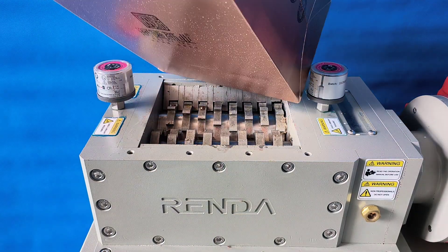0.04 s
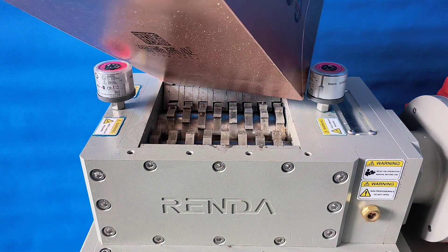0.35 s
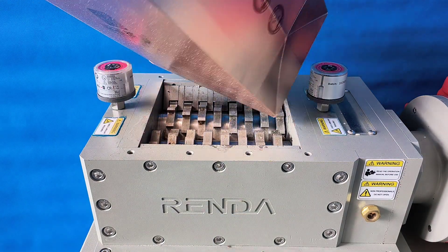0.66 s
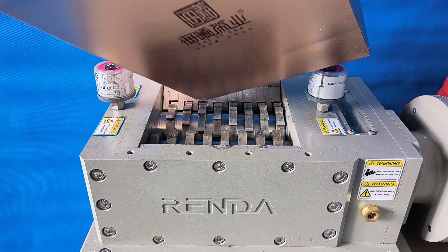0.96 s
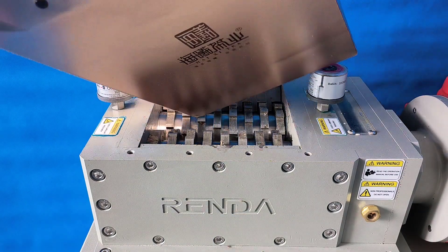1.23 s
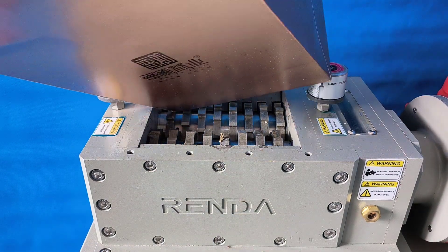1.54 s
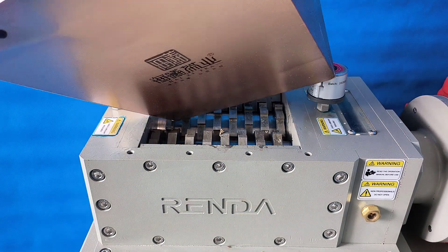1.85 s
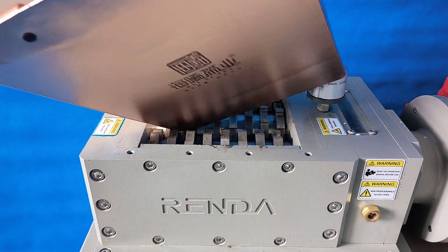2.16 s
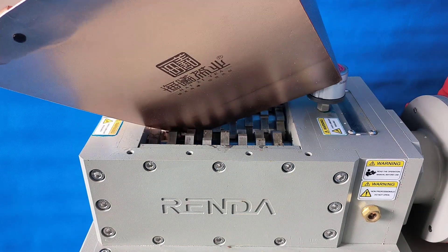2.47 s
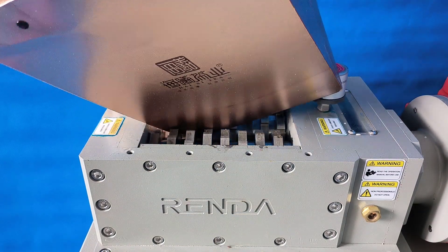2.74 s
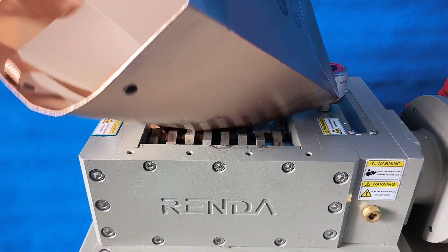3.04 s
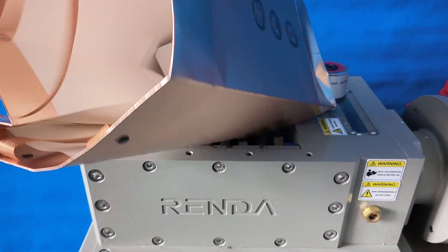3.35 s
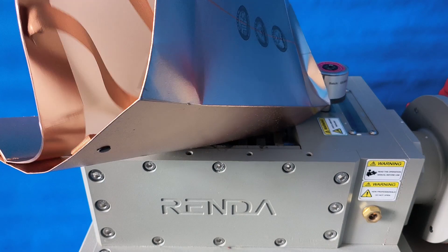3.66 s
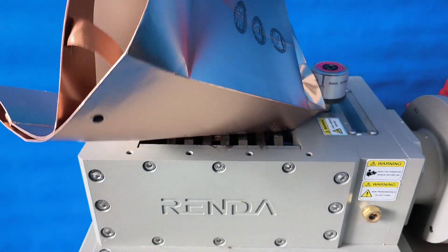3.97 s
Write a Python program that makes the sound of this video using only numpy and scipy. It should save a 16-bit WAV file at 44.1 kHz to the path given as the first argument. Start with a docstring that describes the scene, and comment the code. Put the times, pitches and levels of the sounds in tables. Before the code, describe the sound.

A shredder crushes a stiff cardboard box, crunching and cracking over its humming, whining motor.

```python
"""A small workshop, the microphone close to a running twin-shaft shredder: mains hum, growling and
whining gears, a thin inverter whistle. The toothed rollers rub for a moment. A stiff cardboard box
brushes them, then is gripped and shoved: its fibres crunch, its walls crack, its folds creak and its
hollow panels buckle with dull pops. The room answers the cracks, creaks and pops with a short tail."""
import sys
import numpy as np
from scipy import signal
from scipy.fft import rfft, irfft
from scipy.io import wavfile
from scipy.ndimage import uniform_filter1d

SR = 44100
rng = np.random.default_rng(int(sys.argv[2]) if len(sys.argv) > 2 else 0)


def file_out(sig):
    """Save sig as 16-bit WAV at sys.argv[1]."""
    # one column per channel
    cols = np.atleast_2d(sig).T
    # limit, then scale
    lim = np.clip(cols, -1, 1)
    pcm = np.round(lim * 32767).astype(np.int16)
    wavfile.write(sys.argv[1], SR, pcm)


N = 176400
T = np.arange(N) / SR

# the one rub of the rollers: peak_s, width_s, level_db
ROLLER_RUB = (0.46, 0.1, -52)
# spectrum of crunching board and scraping steel: frequency_hz, gain_db
CRUNCH_COLOUR = [(300, -43), (900, 9), (1700, 5.5), (2300, 4), (3300, 7), (5000, -1), (7000, -7.5),
                 (10000, -27), (16000, -27)]
# the course of the crushing: time_s, crumple_db, crunch_db, hiss_db
CRUSH_LEVELS = [(0, -85, -70, -91), (1.17, -54, -55.5, -79), (1.26, -34, -51, -70), (1.4, -47, -53.5, -82),
                (1.65, -42.5, -55, -82), (1.8, -79, -92, -100), (2.15, -48, -58, -97),
                (2.42, -40.5, -52, -66), (2.53, -44, -46.5, -54), (2.68, -36.5, -43.5, -61),
                (2.78, -52, -47, -55), (2.85, -37, -47, -57), (2.94, -46, -40, -57),
                (3.061, -40, -40.5, -51), (3.22, -31.5, -39, -48), (3.3, -40.5, -48, -51),
                (3.39, -41, -49, -71), (3.47, -42.5, -43, -55), (3.54, -39, -37, -47.5),
                (3.63, -35.5, -42, -53), (3.69, -35.5, -40, -50), (3.76, -46, -40, -49.5),
                (3.91, -34, -40, -50), (4, -38, -39, -46)]


def undb(db):
    """Decibels to gain."""
    return 10 ** (np.asarray(db) / 20)


def unit(x):
    """Scale to rms 1."""
    return x / np.sqrt(np.mean(x ** 2))


def curve(points):
    """Join (time_s, value) points with straight lines."""
    return np.interp(T, *np.array(points).T)


def fade(t, t60_s):
    """Decay that falls 60 dB in t60_s."""
    return np.exp(-np.log(1000) * t / t60_s)


def gains(points, size):
    """Gain per frequency bin from (frequency_hz, gain_db) points."""
    hz, db = np.array(points, float).T
    return undb(np.interp(np.log(np.fft.rfftfreq(size, 1 / SR) + 1), np.log(hz), db))


def colour(x, points):
    """Causal filter with the given spectral shape; white noise keeps its power."""
    size = x.shape[-1]
    cepstrum = irfft(np.log(unit(gains(points, size))), size)
    cepstrum[1:size // 2] *= 2
    cepstrum[size // 2 + 1:] = 0
    return irfft(rfft(x) * np.exp(rfft(cepstrum)), size)


def sides(pan_db):
    """Channel gains for a pan, given as left minus right."""
    pair = undb(np.array([pan_db, -pan_db]) / 2).reshape(2, -1)
    return pair / np.sqrt(np.mean(pair ** 2, axis=0))


def noise(size):
    """White noise at the stereo microphone: alike in the bass, apart in the treble."""
    # side against mid: frequency_hz, gain_db
    stereo_width = [(25, -5), (60, -36), (160, -4.5), (280, -8.5), (500, -10.5), (1000, 3), (2000, 2),
                    (16000, 0)]
    # left against right: frequency_hz, pan_db
    balance = [(100, 1.5), (1200, -1.5), (2000, 1), (2800, 9.5), (4500, 3.5), (8000, 0.5), (15000, 2.5)]
    mid, side = rfft(rng.standard_normal((2, size)))
    width = gains(stereo_width, size)
    pair = np.array([mid + width * side, mid - width * side]) / np.sqrt(1 + width ** 2)
    return irfft(pair * sides(20 * np.log10(gains(balance, size))), size)


def walk(per_s):
    """Smooth random wander with a spread near 1."""
    hold = max(int(SR / per_s), 2)
    steps = np.repeat(rng.standard_normal(N // hold + 2), hold)
    return 1.3 * uniform_filter1d(uniform_filter1d(steps, hold), hold)[:N]


def add(out, start_s, x):
    """Mix a sound in at a time."""
    i = max(int(start_s * SR), 0)
    out[:, i:i + x.shape[-1]] += x[:, :max(N - i, 0)]


def tone(hz, wander_hz, flutter_db, per_s, speed=1):
    """A wavering partial; high ones reach the two channels out of step."""
    phase = 2 * np.pi * (np.cumsum(hz * speed + wander_hz * walk(per_s)) / SR + rng.random())
    lag = np.pi / 2 * min(hz / 1200, 1) ** 2
    return unit(np.sin([phase, phase + lag]) * undb(flutter_db * walk(per_s)))


def motor():
    """Mains hum and the inverter's thin whistle with its sidebands."""
    # mains hum: pitch_hz, level_db
    hum_partials = [(99.7, -34.5), (199.4, -43.5)]
    # the whistle as the box moves over the machine: time_s, level_db
    whistle_levels = [(0, -57), (.3, -55), (.65, -55.5), (1, -50), (1.45, -52.5), (2.1, -51), (2.7, -54),
                      (4, -55.5)]
    # sidebands of the whistle and one faint, very high inverter line: pitch_hz, level_db, pan_db
    inverter_partials = [(7305, -72, 0), (7504, -72, 0), (7751, -61, 1), (7950, -66, 0), (8249, -58.5, 0),
                         (8349, -74, 0), (15800, -80, 0)]
    whistle_hz, whistle_pan_db = 8049.8, -2
    hum = sum(undb(db) * tone(hz, wander_hz=0.34, flutter_db=0.65, per_s=8) for hz, db in hum_partials)
    partials = [(whistle_hz, curve(whistle_levels), whistle_pan_db)] + inverter_partials
    return hum + sum(undb(db) * sides(pan_db) * tone(hz, wander_hz=0.67, flutter_db=-2.7, per_s=5.12)
                     for hz, db, pan_db in partials)


def gear_growl():
    """The low partials of the gearbox throb together."""
    # gearbox growl: pitch_hz, level_db
    partials = [(116, -49.5), (154, -48.5), (166, -43), (186, -41.5), (205, -45)]
    growl = sum(undb(db) * tone(hz, wander_hz=5.113, flutter_db=2, per_s=25) for hz, db in partials)
    throb_db = 2.2 * walk(per_s=28)
    return growl * unit(undb(throb_db))


def gear_whine():
    """The gears whine on one shaft speed; strain and rubbing lift the upper partials."""
    # the whine, one entry a partial: pitch_hz, level_db, pan_db, rub_lift_db
    pitch_hz = [414.5, 479, 499, 646, 696, 843, 926, 1028, 1217, 1335, 1348, 1733, 1771, 1956, 2168, 2190,
                2377, 2797, 3219, 3545, 3639, 4146, 4566]
    level_db = [-59.5, -56.5, -55.5, -53, -61, -54.5, -61, -62, -64, -58, -58.5, -64, -68, -67, -64, -56.5,
                -70, -64.5, -62, -64, -72, -61, -64]
    pan_db = [-27, -14, 0, 29, 0, 11, 4, -1, 4, 3, -6, 2, -12, -1, 1, -1, -8, 10, 1, 8, 7, 2, -2]
    rub_lift_db = [0, 0, 0, 1, 0, 0, 0, 0, 0, 2, 0, 9, 7, 3, 5, 7.5, 9, 13, 4, 1, 7, 5, 0]
    # the shaft slows a little under load: time_s, share_of_idle_speed
    shaft_speed = [(0, 1), (.3, 1), (.45, .9965), (.62, 1), (2.4, 1), (2.8, .998), (3.2, .998), (3.5, .995),
                   (4, .994)]
    # swell as the teeth rub or bite: time_s, gain_db
    strain = [(0, 0.5), (.28, 0.5), (.46, 2), (.62, 1.5), (1, 3), (1.3, 2.5), (2, 0), (2.4, -1), (2.6, 2.5),
              (3, 4.5), (3.5, 7), (4, 4)]
    speed = curve(shaft_speed) + 0.0005 * walk(per_s=3.01)
    strain_db, rub = curve(strain), rub_strength()
    out = np.zeros((2, N))
    for hz, db, pan, lift_db in zip(pitch_hz, level_db, pan_db, rub_lift_db):
        gain = undb(db + strain_db * (hz > 1200) + lift_db * rub)
        out += gain * sides(pan) * tone(hz, wander_hz=3, flutter_db=1.7, per_s=70, speed=speed)
    return out


def rollers_and_fan():
    """The rollers rattle and the fan rushes: a bed of slightly flickering noise."""
    # spectrum of the running machine: frequency_hz, gain_db
    running_colour = [(20, -43), (37, -5.5), (70, 1.5), (170, -2), (250, -0.5), (350, -10), (500, -6.5),
                      (750, -7), (1050, -11), (1300, -8), (1500, -16.5), (2200, -18.5), (3300, -20),
                      (4500, -24), (6500, -34.5), (8000, -22), (9300, -47.5), (15500, -46.5)]
    level_db, flicker_db = -40, 0.87
    rush = noise(N) * undb(flicker_db * walk(per_s=120))
    return unit(colour(rush, running_colour)) * undb(level_db)


def rub_strength():
    """How hard the idle rollers rub, 0 to 1."""
    peak_s, width_s, _ = ROLLER_RUB
    return np.exp(-((T - peak_s) / width_s) ** 2)


def rubbing():
    """Steel scrapes on steel for a moment."""
    _, _, level_db = ROLLER_RUB
    return colour(noise(N), CRUNCH_COLOUR) * undb(level_db) * rub_strength()


def cracks():
    """Each crack is a burst of breaking fibres that dies within milliseconds."""
    # cracks of the walls: start_s, level_db, body_db, treble_db, decay_s
    breaks = [(0.584, -37.5, -3, -16, 0.0025), (1.21, -35, 11, -4, 0.0083), (1.236, -37, 5, -14, .005),
              (1.249, -31.5, 2, -32, 0.009), (1.345, -35, 9, -23, 0.0039), (1.437, -44, 5, -3, .008),
              (1.62, -39, -7, -13, 0.0052), (2.192, -37, 1, -9, .003), (2.292, -32.5, 7, 2, 0.0059),
              (2.428, -35, 9, -37, 0.0048), (2.468, -41, -8, 15, .002), (2.488, -38, -4, 8, .002),
              (2.596, -31, -12, -2, 0.0023), (2.8013, -14, -11, -19, 0.0039), (2.9644, -23, 1, 1.5, 0.0048),
              (2.986, -21.5, 23, 1, 0.0038), (3.044, -26, 14, -14, 0.013), (3.064, -19.5, 21, -16, 0.0034),
              (3.0814, -27.5, -9, 13, 0.0026), (3.092, -26, 1, -14, .002), (3.131, -30.5, -9, -1, 0.0054),
              (3.148, -39, -3, -3, .003), (3.263, -37.5, -13, 20, .003), (3.327, -27, 7, -3, 0.0071),
              (3.3355, -19.5, 10, -7, 0.0054), (3.3438, -14.5, 8.5, -1, 0.004), (3.3496, -20, 7, 1, 0.0038),
              (3.356, -29, -2, 15, 0.0034), (3.3645, -14.5, -8, 11.5, 0.0032), (3.412, -29, -1, -18, .003),
              (3.467, -32, -4, 13, 0.0018), (3.5007, -19.5, -1.5, -23, 0.01),
              (3.5065, -19.5, 15, -6, 0.0066), (3.557, -33, 0, 10, 0.0018), (3.595, -29, 3, -30, 0.011),
              (3.612, -21.5, 1, -15, 0.0041), (3.621, -26, 5, -8, 0.0082), (3.633, -22.5, 3.5, 6, 0.0082),
              (3.654, -31, 2, -13, 0.0024), (3.662, -24, -14, 18, 0.00085), (3.722, -29.5, 8, -8, 0.018),
              (3.756, -27.5, -6, -8, 0.0047), (3.8222, -17, 21, -22, 0.0014), (3.896, -36, 8, -13, 0.0032),
              (3.9319, -17.5, 11.5, 6.5, 0.0032), (3.9526, -22.5, 10.5, 6, 0.0065)]
    # spectrum that body and treble reshape for each crack: frequency_hz, gain_db
    crack_colour = [(80, -20), (400, -5), (1100, -1.5), (2000, -0.5), (3300, 5.5), (5200, 1), (7000, -5),
                    (10000, -10), (16000, -20.5)]
    out, t = np.zeros((2, N)), T[:4096]
    hz, base_db = np.array(crack_colour).T
    body, treble = 1 / (1 + (hz / 2400) ** 6), 1 / (1 + (7000 / hz) ** 4)
    for start_s, level_db, body_db, treble_db, decay_s in breaks:
        shape_db = base_db + body_db * body + treble_db * treble
        burst = noise(len(t)) * np.exp(-t / decay_s)
        add(out, start_s, undb(level_db) * colour(burst, np.column_stack([hz, shape_db])))
    return out


def fibres(snaps_per_s=1500, spread_db=2, decay_s=0.0021):
    """Fibres give way in a dense stream of tiny snaps of unequal size."""
    sizes = undb(spread_db * np.minimum(rng.exponential(size=N), 5))
    snaps = sizes * (rng.random(N) < snaps_per_s / SR)
    power = signal.lfilter([1], [1, -np.exp(-2 / (decay_s * SR))], snaps ** 2)
    return unit(noise(N) * np.sqrt(power))


def crushing():
    """The teeth crumple, crunch and tear the board."""
    # spectra of the low crumpling and the tearing hiss: frequency_hz, gain_db
    crumple_colour = [(20, 15.5), (45, -24), (130, 3), (280, 4), (380, 2.5), (490, 9), (720, -7),
                      (1100, -3.5), (1600, -22), (4000, -46)]
    hiss_colour = [(2500, -48), (6000, 7), (9000, 1.5), (12000, -2.5), (16000, -5)]
    times, *levels = np.array(CRUSH_LEVELS).T
    return sum(colour(fibres(), shape) * undb(np.interp(T, times, db))
               for shape, db in zip((crumple_colour, CRUNCH_COLOUR, hiss_colour), levels))


def creaks(per_s=150, above_crunch_db=1, spread_db=1.7, detune=0.08):
    """Small folds give way, each ringing one resonance of the board; their level follows the crunch."""
    # resonances of the board: pitch_hz, t60_s, gain_db
    board_modes = [(480, .04, -12), (855, 0.05, 3), (1020, 0.033, 3.5), (1260, 0.024, 5),
                   (1760, 0.014, -16), (2250, 0.026, 2), (2710, 0.014, -3), (3050, 0.014, 3)]
    out, t = np.zeros((2, N)), T[:2048]
    times, _, crunch_db, _ = np.array(CRUSH_LEVELS).T
    for when, which, tuning, lag, force in rng.random((int(per_s * N / SR), 5)):
        start_s = when * N / SR
        hz, t60_s, gain_db = board_modes[int(which * len(board_modes))]
        phase = 2 * np.pi * hz * (1 + detune * (2 * tuning - 1)) * t
        ring = np.sin([phase, phase + np.pi * (lag - 0.5)]) * fade(t, t60_s)
        level_db = np.interp(start_s, times, crunch_db) + above_crunch_db + gain_db
        accent_db = spread_db * min(-np.log(1 - force), 3)
        add(out, start_s, ring * undb(level_db + accent_db))
    return out


def buckles(detune=0.015, rattle_db=6.5, rattle_decay_s=0.0068):
    """A panel snaps through and rings the box: a longer push is duller, a large panel booms."""
    # buckling panels: start_s, level_db, push_s, boom_db
    pops = [(1.232, -25.5, 0.0027, -4), (1.242, -28, 0.00094, -1), (1.252, -31, 0.00072, -2),
            (2.428, -28, 0.002, 5.5), (2.55, -29.5, 0.0031, 17), (2.8018, -17.5, 0.00065, -8),
            (2.812, -33, 0.0004, 3), (2.987, -28, 0.0021, 9), (3.043, -26.5, 0.00084, -3),
            (3.099, -26.5, 0.0034, -9), (3.5072, -15, 0.00077, -13), (3.516, -23.5, 0.003, -13),
            (3.739, -17, 0.0033, 9), (3.747, -26.5, 0.00071, 0), (3.757, -29, 0.00081, -11),
            (3.771, -33, 0.00072, -8), (3.935, -32, 0.001, 2)]
    # modes of the box: pitch_hz, gain_db, t60_s
    box_modes = [(103, -10, 0.1), (165, 0.5, 0.085), (269, 0, 0.044), (338.5, 0, 0.046), (402, -13, 0.03),
                 (489, 4.5, 0.056), (746, -2, 0.04), (922, -4, 0.026), (1107, -5, 0.041),
                 (1250, -0.5, 0.037)]
    # band of the hollow boom: low_hz, high_hz
    boom_band = (130, 220)
    # spectrum of a rattling panel: frequency_hz, gain_db
    rattle_colour = [(90, -24), (170, 1), (330, 1.5), (480, 10), (700, -7.5), (1200, 12.5), (1700, -6.5),
                     (4000, -25)]
    out, t = np.zeros((2, N)), T[:8192]
    for start_s, level_db, push_s, boom_db in pops:
        tunings = 1 + detune * rng.standard_normal(len(box_modes))
        ring = np.zeros(len(t))
        for (hz, gain_db, t60_s), tuning in zip(box_modes, tunings):
            gain = undb(gain_db + boom_db * (boom_band[0] < hz < boom_band[1]))
            ring += gain * np.cos(2 * np.pi * hz * tuning * t) * fade(t, t60_s)
        rattle = undb(rattle_db) * colour(noise(len(t)), rattle_colour) * np.exp(-t / rattle_decay_s)
        push = np.sin(np.pi * np.minimum(t / push_s, 1))[None, :512]
        pop = signal.fftconvolve(ring + rattle, push, axes=1)
        attack_rms = np.sqrt(np.mean(pop[:, :441] ** 2))  # first 10 ms
        add(out, start_s, undb(level_db) * pop / attack_rms)
    return out


def shoves(pitch_hz=52.3, width_s=0.017):
    """Deep, soft bumps as a tooth catches the whole box."""
    # bumps: centre_s, level_db
    bumps = [(1.35, -40), (1.62, -39), (2.2, -45), (2.3, -47), (2.81, -53), (3.035, -34), (3.515, -52),
             (3.72, -55)]
    out = np.zeros(N)
    for centre_s, level_db in bumps:
        t = T - centre_s
        swell = np.sqrt(2) * np.exp(-(t / width_s) ** 2 / 2)
        out += undb(level_db) * swell * np.sin(2 * np.pi * pitch_hz * t)
    return out


def room(x, level_db=-11, t60_s=0.39, delay_s=0.0039):
    """The direct sound plus the short diffuse tail of a small workshop."""
    # spectrum of the tail: frequency_hz, gain_db
    room_colour = [(100, -9), (500, 3), (4000, -0.5), (14000, -1.5)]
    t = T[:32768]
    tail = colour(noise(len(t)), room_colour) * fade(t, t60_s) * (t > delay_s)
    tail /= np.sqrt(np.sum(tail ** 2) / 2)
    return x + undb(level_db) * signal.fftconvolve(x, tail, axes=1)[:, :N]


def scene():
    """The running machine and the box in its teeth, heard from close by."""
    machine = motor() + gear_growl() + gear_whine() + rollers_and_fan() + rubbing()
    box = crushing() + shoves() + room(cracks() + buckles() + creaks())
    return machine + box


def record(dry):
    """The recorder clips peaks at full scale and cuts the treble above 16 kHz."""
    lowpass = signal.ellip(10, 0.1, 80, 16000, fs=SR, output="sos")
    return signal.sosfilt(lowpass, np.clip(dry, -1, 1))


dry = scene()
out = record(dry)
file_out(out)
```